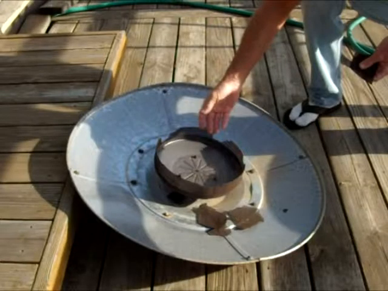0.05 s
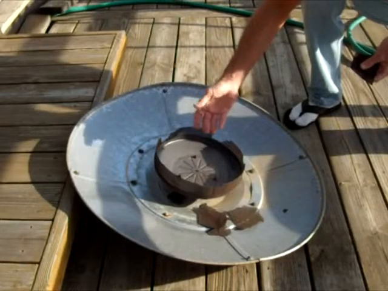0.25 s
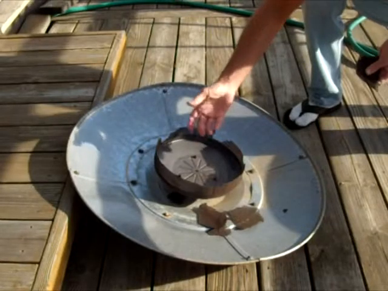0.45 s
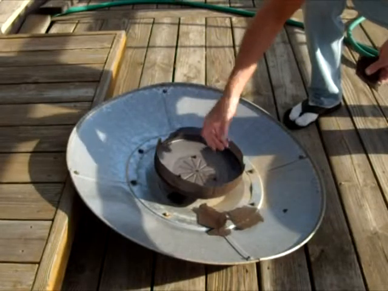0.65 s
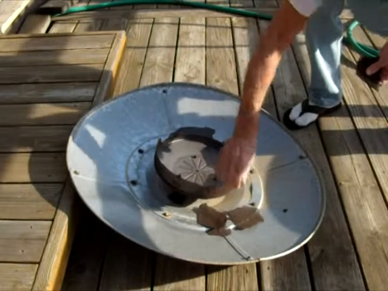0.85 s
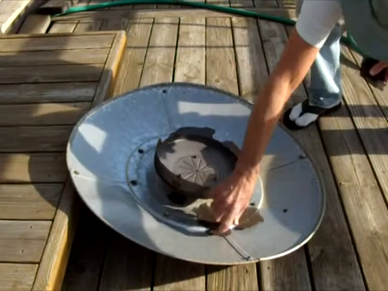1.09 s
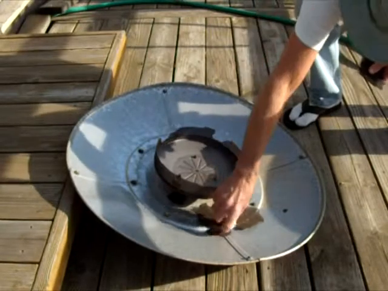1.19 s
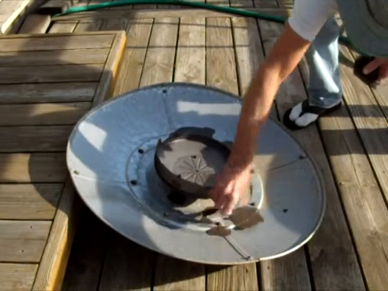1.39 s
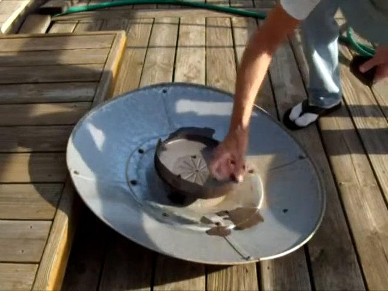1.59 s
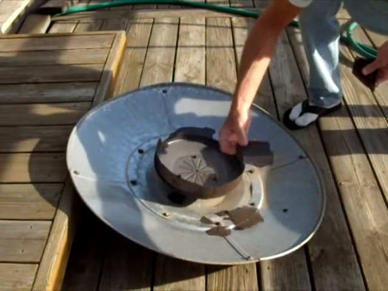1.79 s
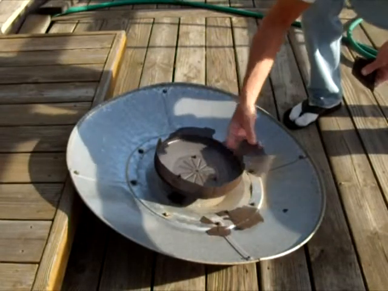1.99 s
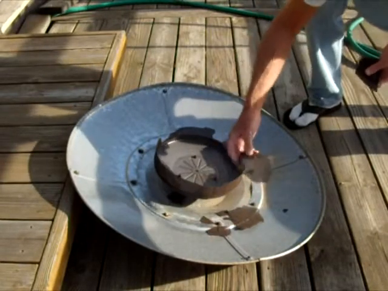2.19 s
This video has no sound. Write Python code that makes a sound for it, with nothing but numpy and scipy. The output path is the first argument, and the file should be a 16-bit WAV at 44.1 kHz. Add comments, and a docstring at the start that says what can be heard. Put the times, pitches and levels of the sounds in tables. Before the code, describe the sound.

Metal clanks onto a sheet-metal dish, then a shard is knocked and scraped across it.

```python
"""Out of silence, a broken metal piece clatters onto the sheet-metal dish of a patio heater lying on a deck.
The boards thud and the dish rings briefly, dying away into outdoor rumble, soft hums and a faint, thin
whine. A second later a hand knocks a rusty shard, which tips with a hollow clunk, and drags it up off
the dish, its rust grains catching and slipping. The outdoor air and a low hum remain."""
import sys
import numpy as np
from scipy import signal
from scipy.fft import rfft, irfft, next_fast_len
from scipy.io import wavfile
from scipy.ndimage import map_coordinates

SR = 44100
rng = np.random.default_rng(int(sys.argv[2]) if len(sys.argv) > 2 else 0)


def wav_out(sig):
    """Save sig, one row per channel (or a flat mono array), as 16-bit PCM at SR to the path in sys.argv[1]."""
    wavfile.write(sys.argv[1], SR, np.round(np.clip(np.atleast_2d(sig).T, -1, 1) * 32767).astype(np.int16))


N = 99225
ATTACK_S = 0.00039  # time constant of a hard metal contact

# Tone of the rusty shard against the dish. Each row: frequency in Hz, relative level in dB.
SHARD_COLOUR = [(120, -43), (200, -18), (239, -12), (299, -12.5), (336, -2.5), (433, -13.5), (618, -7),
                (716, -11), (819, -2.5), (1850, -8), (2760, -1.5), (5390, -25.5), (6930, -61.5),
                (9010, -93), (15200, -120)]
# Decay of the lesser modes while the hand damps the dish. Each row: frequency in Hz, T60 in seconds.
DAMPED_DECAY = [(300, 0.17), (1000, 0.73), (2500, 0.32), (6000, 0.22)]


def clank(crowd, crack_db=3.5, crack_t60_s=0.045, wash_db=-8, ring_db=-7.5):
    """The piece lands and chatters; each contact cracks and rings the dish."""
    # Contacts of the falling piece. Each row: start in seconds, relative level in dB.
    contacts = [(0.2054, -23), (.209, -25.5), (0.2136, -21.5), (.218, -20.5), (.226, -23), (0.2334, -22.5),
                (0.2366, -23), (.240, -22), (0.2606, -26.5), (.269, -30), (.283, -33), (.309, -32),
                (.341, -35)]
    # Tone of the impact. Each row: frequency in Hz, relative level in dB.
    impact_colour = [(71, -50), (120, -13), (225, -26), (310, -2), (381, -14), (543, -9.5), (803, -5),
                     (951, -1.5), (1070, -9.5), (1190, -2.5), (1750, -14), (2550, -13), (4090, -28.5),
                     (5370, -36), (6930, -61.5), (9010, -79.5), (15200, -120)]
    # Decay of the lesser modes as the dish rings freely. Each row: frequency in Hz, T60 in seconds.
    free_decay = [(250, 0.29), (900, 0.53), (2500, 0.58), (6000, 0.52)]
    out, pushes, t = np.zeros(N), np.zeros(N), np.arange(SR) / SR
    colour = lambda hz: amp(along(impact_colour, hz))
    attack = 1 - np.exp(-t / ATTACK_S)
    push = np.exp(-t / ATTACK_S) * t
    for start, db in contacts:
        crack = noise(colour, size=SR) * amp(crack_db - 60 * t / crack_t60_s)
        tail = amp(wash_db) * wash(colour, crowd, free_decay)
        add(out, start, amp(db) * attack * (crack + tail))
        add(pushes, start, amp(db) * push / np.linalg.norm(push))
    return out + amp(ring_db) * ring(pushes)


def ring(strength, shimmer_db=1):
    """The dish's main modes store the energy of every push and lose it, each at its own speed."""
    # Main modes of the dish. Each row: frequency in Hz, relative level in dB, T60 in seconds.
    modes = [(314, -13, .4), (558, -15, .35), (820, -13, .35), (853, -13, .4), (953, -10, .48),
             (1023, -12, .4), (1167, 1.5, .42), (1206, -6, .45), (1260, -6, .38), (1362, -10, .55),
             (1399, -6, .42), (1540, -13, .45), (1879, -15, .45), (2191, -14, .4), (2293, -13, .6),
             (2486, -8, .6), (2526, -13, .4), (2595, -15, .5), (2732, -14, .35), (2766, -12, .45),
             (2977, -19, .6), (3140, -21, .55), (3208, -24, .7), (3462, -27, 1.1), (4560, -38, 1.2),
             (5512, -35, .65), (5706, -45, .85), (6830, -52, .55)]
    out, t = np.zeros(N), np.arange(N) / SR
    for hz, db, t60 in modes:
        energy = signal.lfilter([1], [1, -amp(-120 / (t60 * SR))], strength ** 2)
        gain = amp(db + shimmer_db * wobble(14))
        phase = 2 * np.pi * (hz * t + rng.random()) + 0.24 * wobble(15)
        out += gain * np.sqrt(energy) * np.sin(phase)
    return out


def lesser_modes(modes_per_hz=0.12, spread_db=1):
    """The dish's dense crowd of lesser modes, as a strength for every Hz."""
    size = SR // 2 + 1
    return (rng.random(size) < modes_per_hz) * amp(spread_db * rng.standard_normal(size))


def wash(response, crowd, ring_times):
    """One second of metallic wash: the lesser modes dying away after a contact."""
    phases = np.exp(2j * np.pi * rng.random(len(crowd)))
    steady = irfft(crowd * response(np.arange(len(crowd))) * phases)
    hz, t, spectrum = signal.stft(unit(steady), SR, nperseg=256)
    decay = amp(-60 * t / along(ring_times, hz)[:, None])
    return signal.istft(spectrum * decay, SR, nperseg=256)[1][:SR]


def knocks(crowd, clunk_at_s=1.2803, clunk_hz=860, clunk_db=-17, clunk_rise_s=0.002, wash_db=-13.5):
    """The shard tips with a hollow clunk and knocks on the dish; the hand keeps every hit short."""
    # Knocks of the gripped shard. Each row: start in seconds, relative level in dB, centre in Hz,
    # half-width in octaves, T60 in seconds.
    hits = [(1.248, -37, 750, 0.44, .12), (1.287, -24, 560, 0.37, 0.076), (1.309, -23.5, 950, .6, 0.019),
            (1.320, -26.5, 1200, .5, .06), (1.331, -27, 2600, 0.46, 0.099), (1.334, -24.5, 800, 1.1, 0.13),
            (1.348, -26.5, 2400, .8, 0.014)]
    out, t = np.zeros(N), np.arange(SR) / SR
    swell = (t / clunk_rise_s * np.exp(1 - t / clunk_rise_s)) ** 2
    add(out, clunk_at_s, amp(clunk_db) * swell * np.sin(2 * np.pi * clunk_hz * t))
    attack = 1 - np.exp(-t / ATTACK_S)
    for start, db, centre_hz, width, t60 in hits:
        colour = lambda hz: amp(along(SHARD_COLOUR, hz)) / (1 + (np.log2((hz + 1) / centre_hz) / width) ** 2)
        body = noise(colour, size=SR) * amp(-60 * t / t60)
        tail = amp(wash_db) * wash(colour, crowd, DAMPED_DECAY)
        add(out, start, amp(db) * attack * (body + tail))
    return out


def scrape(crowd, grains_per_s=4000, spread_db=5, catches_per_s=90, catch_db=1.4,
           soft_below_hz=1500, bass_follows=0.55, direct_db=-3.5, wash_db=-6, ring_db=-13):
    """Rust grains catch and slip under the drag and shake the dish; a lighter touch is duller."""
    # Force of the drag. Each row: time in seconds, relative level in dB.
    drag_force = [(1.149, -67), (1.235, -45.5), (1.275, -35), (1.31, -32.5), (1.34, -27), (1.375, -38),
                  (1.403, -26), (1.429, -28), (1.46, -30.5), (1.504, -28.5), (1.548, -32), (1.6, -42),
                  (1.644, -53.5), (1.72, -72.5)]
    force_db = np.interp(np.arange(N) / SR, *np.transpose(drag_force), left=-120, right=-120)
    grains = (rng.random(N) < grains_per_s / SR) * rng.choice([-1, 1], N)
    grains = unit(grains * amp(spread_db * rng.uniform(-1.2, 1, N)))
    slips = unit(grains * amp(catch_db * wobble(catches_per_s)))
    soft = filtered(slips, lambda hz: 1 / (1 + (hz / soft_below_hz) ** 4))
    peak_db = force_db.max()
    soft_db = peak_db + bass_follows * (force_db - peak_db)  # the lows fade less than the grit
    drive = amp(force_db) * (slips - soft) + amp(soft_db) * soft
    colour = lambda hz: amp(along(SHARD_COLOUR, hz))
    direct = filtered(drive, colour) / np.std(filtered(slips, colour))
    dish_response = wash(colour, crowd, DAMPED_DECAY)
    shaken = signal.fftconvolve(drive, dish_response / np.linalg.norm(dish_response))[:N]
    rung = ring(amp(force_db) / np.sqrt(SR))
    return amp(direct_db) * direct + amp(wash_db) * shaken + amp(ring_db) * rung


def thuds(centre_hz=98, t60_s=0.097, attack_s=0.0048):
    """The heavier contacts pass through the dish and thud dully in the deck boards."""
    # Thuds of the boards. Each row: start in seconds, level in dB.
    hits = [(0.226, -21.5), (1.283, -31), (1.328, -28)]
    out, t = np.zeros(N), np.arange(SR) / SR
    attack = 1 - np.exp(-t / attack_s)
    for start, db in hits:
        boards = noise(lambda hz: 1 / (1 + (np.log2((hz + 1) / centre_hz) / .5) ** 4), size=SR)
        add(out, start, boards * amp(db - 60 * t / t60_s) * attack)
    return out


def air(rumble_below_hz=67, lumpy_db=1.6, drift_db=-0.5, hush_follows=0.71):
    """Outdoor hush over an uneven low rumble, both easing off with the breeze."""
    # Tone of the outdoor air. Each row: frequency in Hz, relative level in dB.
    air_colour = [(15, -29.5), (25, 1), (87, -8), (194, -22), (245, -21.5), (276, -27.5), (402, -29),
                  (463, -28.5), (586, -33.5), (724, -31), (1190, -35.5), (1300, -35), (1430, -36),
                  (3760, -46.5), (6930, -81.5), (9010, -114), (15200, -120)]
    # Strength of the breeze. Each row: time in seconds, level in dB.
    breeze = [(.2, -32), (.6, -32), (.9, -32.5), (1.15, -34.5), (1.751, -35), (2.25, -35)]
    level_db = np.interp(np.arange(N) / SR, *np.transpose(breeze))
    swing_db = level_db - level_db.mean()
    bed = noise(lambda hz: amp(along(air_colour, hz)), size=N)
    rumble = filtered(bed, lambda hz: 1 / (1 + (hz / rumble_below_hz) ** 4))
    hush = (bed - rumble) * amp(hush_follows * swing_db + drift_db * wobble(6.6))
    return amp(level_db.mean()) * (rumble * amp(swing_db + lumpy_db * wobble(16)) + hush)


def far_tones():
    """Soft hums and a thin, slightly rising whine come and go in the distance."""
    # Soft hums. Each row: start and end in seconds, pitch in Hz, level in dB.
    hums = [(.2, 1.16, 466, -56.5), (0.501, 1.42, 710, -64), (1.65, 2.3, 242, -53)]
    # Faint whines. Each row: start and end in seconds, first and last pitch in Hz, level in dB.
    whines = [(.48, .65, 1358, 1364, -55), (.82, .92, 1270, 1290, -59), (.93, 1.2, 1270, 1320, -56.5)]
    humming = sum(amp(db) * tone(start, end, hz, hz, waver=0.004) for start, end, hz, db in hums)
    whining = sum(amp(db) * tone(*glide, waver=0.0082) for *glide, db in whines)
    return humming + whining


def tone(start, end, first_hz, last_hz, waver, fade_s=0.03, flutter_db=1.2):
    """A far, unsteady tone that fades in and out."""
    t = np.arange(N) / SR
    hz = np.interp(t, [start, end], [first_hz, last_hz]) * (1 + waver * wobble(35))
    fade = np.clip(np.minimum(t - start, end - t) / fade_s, 0, 1)
    return np.sqrt(2) * fade * amp(flutter_db * wobble(30)) * np.sin(2 * np.pi * np.cumsum(hz) / SR)


def amp(db):
    """Decibels to gain."""
    return 10 ** (np.asarray(db) / 20)


def unit(x):
    """Scale to rms 1."""
    return x / np.sqrt(np.mean(x ** 2) + 1e-20)


def along(points, hz):
    """Read a curve of (Hz, value) points on a log frequency axis."""
    freqs, values = np.transpose(points)
    return np.interp(np.log(hz + 1), np.log(freqs + 1), values)


def wobble(rate):
    """A smooth random curve, rate knots a second."""
    return map_coordinates(rng.standard_normal(1024), [np.arange(N) * rate / SR], mode="wrap")


def filtered(x, response):
    """Shape x with a frequency response."""
    size = next_fast_len(len(x) + 8192)
    return irfft(rfft(x, size) * response(np.fft.rfftfreq(size, 1 / SR)), size)[:len(x)]


def noise(response, size):
    """Coloured noise of rms 1."""
    return unit(filtered(rng.standard_normal(size), response))


def add(track, start_s, sound):
    """Mix a sound into the track at start_s."""
    part = track[round(start_s * SR):][:len(sound)]
    part += sound[:len(part)]


def scene():
    """Clatter, knocks and drag on one dish, over the deck and the outdoor bed, in mono."""
    crowd = lesser_modes()
    return (clank(crowd) + knocks(crowd) + scrape(crowd) + thuds() + air() + far_tones())[None]


def record(dry, open_at_s=0.203, fade_s=0.003, low_cut_hz=32, high_cut_hz=7000):
    """The sound cuts in at the clank, with the deep bass thinned and the high treble cut away."""
    t = np.arange(N) / SR
    gate = np.clip(np.minimum(t - open_at_s, t[::-1]) / fade_s, 0, 1)
    thinned = filtered(dry[0], lambda hz: 1j * hz / (1j * hz + low_cut_hz))
    return filtered(thinned * gate, lambda hz: 1 / np.sqrt(1 + (hz / high_cut_hz) ** 90))[None]


dry = scene()
out = record(dry)
wav_out(out)
```